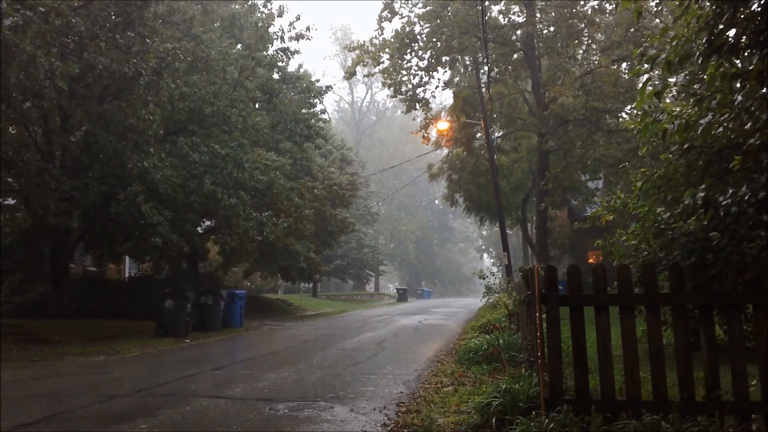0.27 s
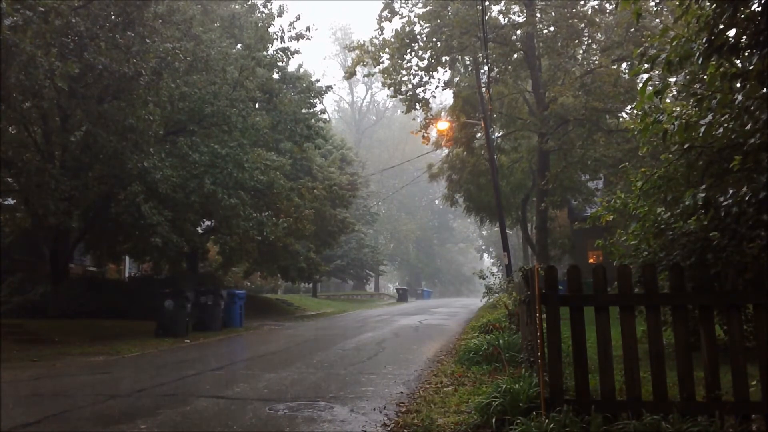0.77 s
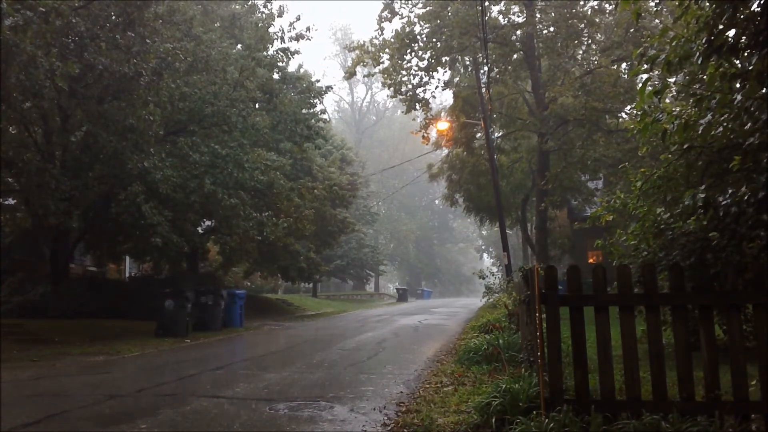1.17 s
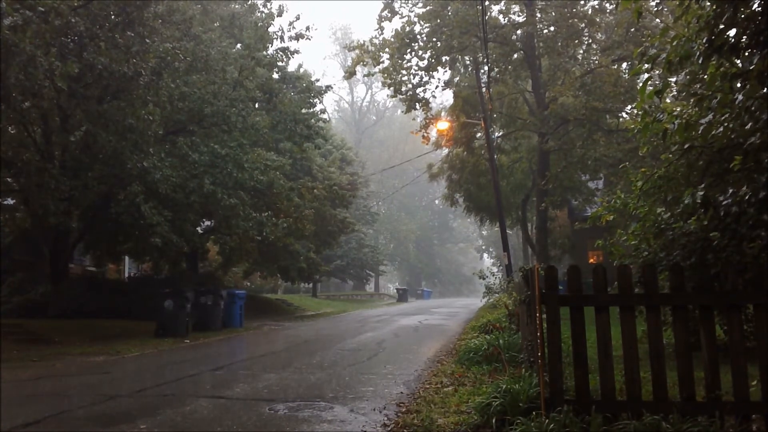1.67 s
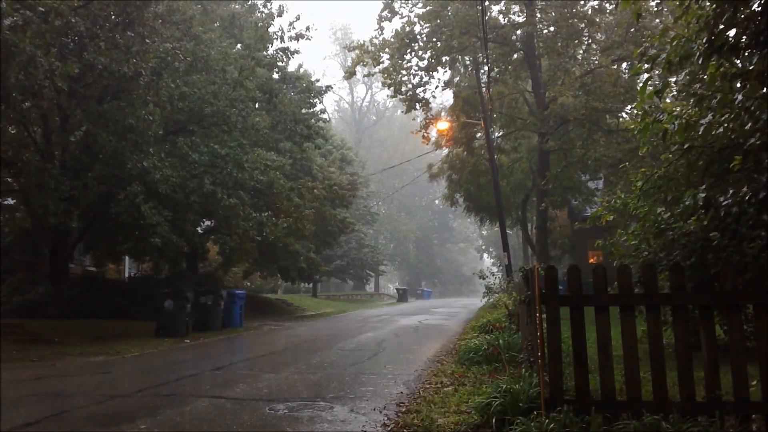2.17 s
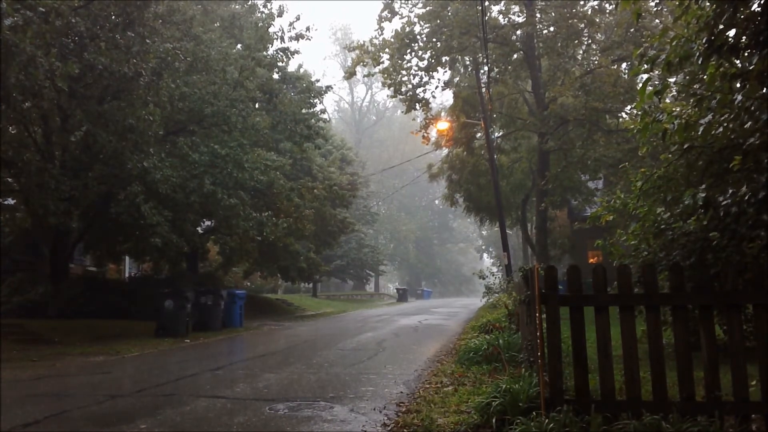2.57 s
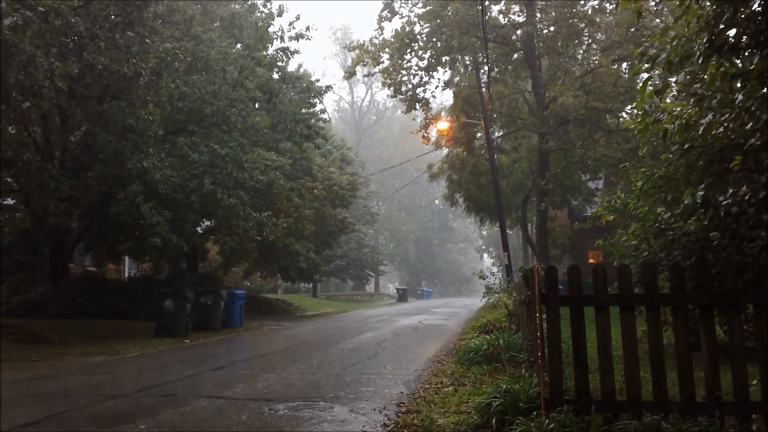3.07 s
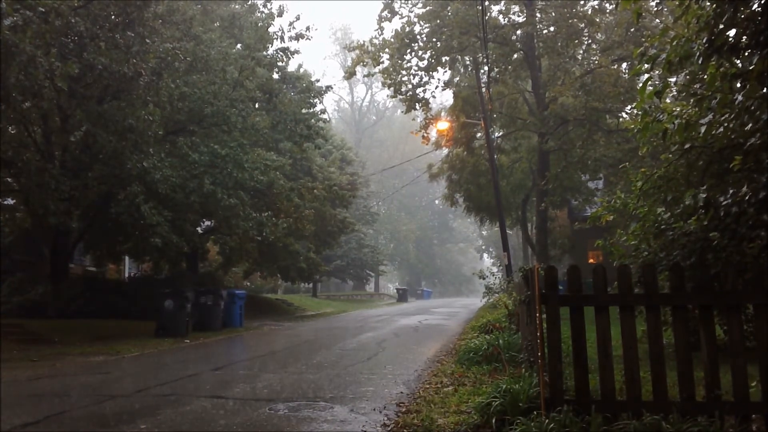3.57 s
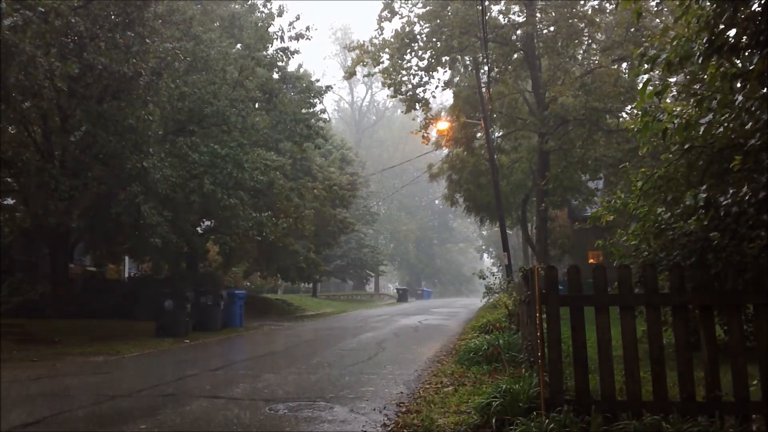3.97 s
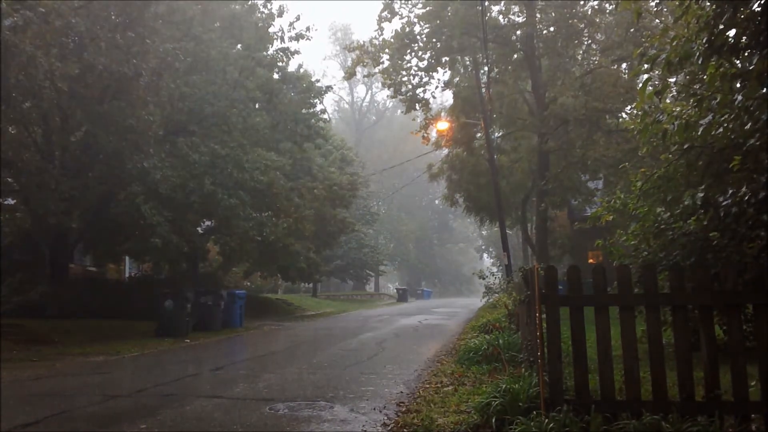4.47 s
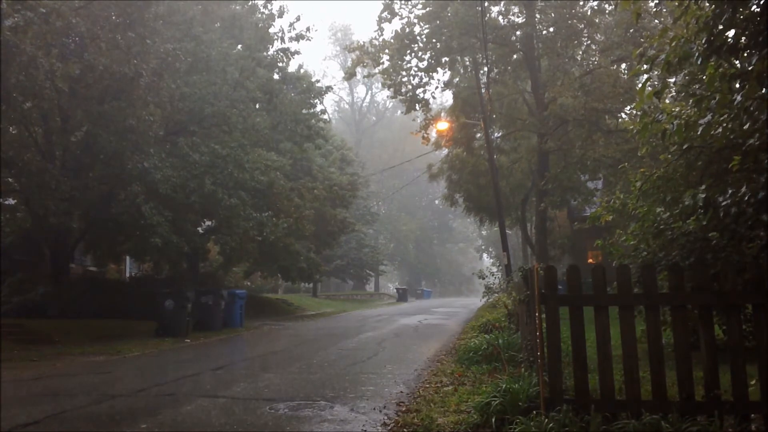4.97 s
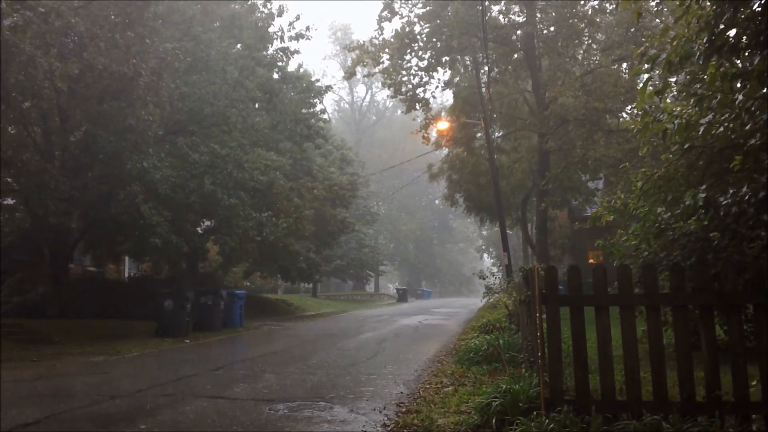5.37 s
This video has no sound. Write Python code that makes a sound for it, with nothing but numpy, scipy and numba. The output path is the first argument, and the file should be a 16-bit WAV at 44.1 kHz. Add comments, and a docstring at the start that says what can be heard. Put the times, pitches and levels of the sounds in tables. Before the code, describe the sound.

Raindrops splat loudly on the microphone and plop on an umbrella over a steady rainy wash and a distant car.

```python
"""Steady rain on a tree-lined street, heard from under an umbrella, a car droning far off throughout.
In the first second drops splat on the camera, ring its housing and overload the microphone's preamp;
the gain control ducks, then lets the rain swell back. Drips plop on the canopy, leaves tick faintly.
Around 2.5 s dull knocks on the camera duck the gain again, and lighter drops follow.
Near 5.2 s the wash rises a little as the far car passes on the wet road."""
import sys
import numpy as np
from scipy import signal
from scipy.fft import rfft, irfft
from scipy.io import wavfile
from numba import njit

SR = 44100
rng = np.random.default_rng(int(sys.argv[2]) if len(sys.argv) > 2 else 0)


def transcribe(u):
    """Save the signal u as a 16-bit wav file named by the first command-line argument.

    u: samples, shape (n,) or (channels, n), limited to [-1, 1]; the rate is SR.
    q: integer samples, one column per channel.
    """
    v = np.clip(np.atleast_2d(u).T, -1, 1)
    q = np.round(v * 32767).astype(np.int16)
    wavfile.write(sys.argv[1], SR, q)


N = 248718
TIME = np.arange(N) / SR


def undb(db):
    """Decibels to gain."""
    return 10 ** (np.asarray(db) / 20)


def level(x, db):
    """Scale to an rms level."""
    return x * undb(db) / np.sqrt(np.mean(x ** 2))


def decay(t, t60):
    """An envelope that falls 60 dB in t60 seconds."""
    return np.exp(-np.log(1000) * t / t60)


def ring(hz, t60):
    """One struck mode: a sine that dies away."""
    t = TIME[:int(1.5 * t60 * SR) + 2]
    return np.sin(2 * np.pi * hz * t) * decay(t, t60)


def band_noise(low_hz, high_hz, samples):
    """White noise through a band-pass."""
    band = signal.butter(2, [low_hz, high_hz], "band", fs=SR, output="sos")
    return signal.sosfilt(band, rng.standard_normal(samples))


def wander(rate_hz):
    """Slow random drift with a spread near 1."""
    knots = rng.standard_normal(1024)
    return np.interp(TIME * rate_hz, np.arange(len(knots)), knots)


def patter(sound, per_s, spread_db):
    """One sound struck at random times, mostly lightly, now and then harder."""
    chance, size, sign = rng.random(N), rng.exponential(size=N), rng.choice([-1, 1], N)
    impulses = (chance < per_s / SR) * sign * undb(spread_db * np.minimum(size, 5))
    return signal.oaconvolve(impulses, sound)[:N]


def strike(out, s, sound, contact_s):
    """Mix in a blow at time s; a drop pushes for a short while, which takes the edge off the sound."""
    t = np.arange(-64, 65) / SR
    push = np.exp(-(2 * t / contact_s) ** 2)
    softened = np.convolve(sound, push / push.sum())
    start = int(np.clip(s * SR - 64, 0, N - 1))
    out[start:start + len(softened)] += softened[:N - start]


# Rain and wet tyres far down the street: (frequency [Hz], relative spectral density [dB])
WASH_SPECTRUM = [(30, -36), (48, -24), (70, -21), (130, -11.5), (220, -10.5), (330, -9.5), (480, -4),
                 (660, 3), (900, -12.5), (1350, -21.5), (1900, -28), (2800, -36), (6500, -49),
                 (15000, -52.5)]


def street_wash():
    """Countless far drops and tyre hiss merge; each octave flickers, and all swell as the car goes by."""
    hz, db = np.transpose(WASH_SPECTRUM)
    octave = np.log2(np.maximum(np.fft.rfftfreq(N, 1 / SR), 1))
    spectrum = rfft(rng.standard_normal(N)) * undb(np.interp(octave, np.log2(hz), db))
    wash = np.zeros(N)
    for centre in range(4, 16):
        band = irfft(spectrum * np.maximum(1 - abs(octave - centre), 0), N)
        flicker_db = 1.8 if centre < 11 else 0.6  # the treble comes from more drops and is smoother
        wash += band * undb(flicker_db * wander(rate_hz=48))
    pass_s, pass_width_s = 5.23, 0.44
    swell_db = 1.8 * np.exp(-((TIME - pass_s) / pass_width_s) ** 2)
    return level(wash, db=-23.5) * undb(swell_db)


# Partials of the engine, far from the microphone: (frequency [Hz], rms level [dB])
ENGINE_PARTIALS = [(63.5, -34.5), (95, -42.5), (127, -38.5), (191, -45)]


def far_engine():
    """The car's engine drones, wavering in speed and strength."""
    engine_time = np.cumsum(1 + 0.018 * wander(rate_hz=6.5)) / SR
    drone = np.zeros(N)
    for hz, db in ENGINE_PARTIALS:
        strength = undb(4.0 * wander(rate_hz=6.9))
        drone += level(np.sin(2 * np.pi * hz * engine_time) * strength, db)
    return drone


def leaves():
    """Drops tick faintly on the street trees, the leaves sounding at four pitches."""
    foliage = np.zeros(N)
    for hz in np.geomspace(3300, 4150, num=4):
        click = ring(hz, t60=0.0024)
        foliage += patter(np.convolve(click, click), per_s=7, spread_db=1.0)
    return level(foliage, db=-58.5)


# Modes of the taut canopy, just above the microphone: (frequency [Hz], relative level [dB], t60 [s])
CANOPY_MODES = [(93.5, -9.5, 0.11), (164, -30, 0.12), (176.7, -21.5, 0.52), (306, -35.5, 0.21),
                (367.3, -5.5, 0.4), (517.8, 7.5, 0.16), (550, -11.5, 0.043), (601.5, -3, 0.42),
                (673, -26.5, 0.18)]
# Heavy drips from the trees onto it: (time [s], canopy level [dB], panel level [dB], panel pitch [Hz])
TREE_DRIPS = [(0.104, -17, -9.5, 375), (1.185, -17.5, -21, 570), (1.6343, -9.5, 3.5, 677),
              (1.858, -20, -43, 560), (1.977, -19.5, -12.5, 713), (2.060, -18, -20, 544),
              (2.1929, -15.5, 1, 618), (2.386, -22, -19, 376), (2.421, -15, -14, 387),
              (2.821, -14.5, -32, 530), (3.051, -28, -13.5, 597), (3.53, -12, -15.5, 475),
              (3.940, -27, -14.5, 365), (4.333, -11, -16, 500), (4.753, -13, -4, 534),
              (5.405, -18, -17, 380), (5.563, -11, -19, 398)]


def umbrella():
    """Fine rain keeps the canopy murmuring; drips land at different spots and stir its modes unevenly."""
    plops, murmur = np.zeros(N), np.zeros(N)
    spots = rng.standard_normal((len(TREE_DRIPS), len(CANOPY_MODES), 2))
    for k, (hz, mode_db, t60) in enumerate(CANOPY_MODES):
        # neighbouring modes start in opposite directions, so a plop takes a moment to build
        mode_gain = (-1) ** k * undb(mode_db)
        murmur += patter(mode_gain * ring(hz, t60), per_s=140, spread_db=7)
        for (s, canopy_db, _, _), (share, water) in zip(TREE_DRIPS, spots[:, k]):
            mode = ring(hz * (1 + 0.013 * water), t60)  # water lying on the cloth detunes it
            strike(plops, s, mode_gain * undb(canopy_db + 0.5 * share) * mode, contact_s=0.00089)
    # the struck panel gives a short tock, and the wet cloth flaps dully
    t = TIME[:SR // 8]
    for s, canopy_db, panel_db, panel_hz in TREE_DRIPS:
        panel = ring(panel_hz, t60=0.022)
        tock = np.convolve(panel, panel)  # builds over a few cycles
        strike(plops, s, undb(panel_db) * tock / abs(tock).max(), contact_s=0.00044)
        flap = level(band_noise(260, 620, len(t)), canopy_db - 4.5)
        strike(plops, s, flap * np.exp(-t / 0.013), contact_s=0.00024)
    return plops + level(murmur, db=-33)


def tick(hz, t60):
    """The snap of contact: a very short ring, roughened by the bursting drop, then a trace of spray."""
    t = TIME[:SR // 20]
    snap = -np.sin(2 * np.pi * hz * t) * decay(t, t60)
    spatter = band_noise(0.3 * hz, min(1.15 * hz, 0.4 * SR), len(t))
    burst = undb(-8.5) * np.exp(-t / 0.0019)
    spray = undb(-31.5) * np.exp(-t / 0.005)
    return snap + spatter * (burst + spray)


def housing(blows, relative_thud_db, low_cut_hz):
    """Each blow rings two modes of the camera housing and gives the whole body a low push."""
    out = np.zeros(N)
    t = TIME[:SR // 16]
    thud = ring(hz=129.6, t60=0.03)
    for s, db, hz, t60 in blows:
        contact_s = 0.25 / hz  # blows that ring lower are softer
        modes = ring(hz, t60) + undb(-14.5) * ring(1.8 * hz, t60)
        strike(out, s, undb(db) * modes, contact_s)
        # the spreading water jostles the housing and makes its ring uneven
        jostle = level(band_noise(0.13 * hz, 3 * hz, len(t)), db - 10.5)
        strike(out, s, jostle * decay(t, t60), contact_s)
        strike(out, s, undb(db + relative_thud_db) * thud, contact_s=0.00064)
    # so small a body gives no deep bass
    return signal.sosfilt(signal.butter(1, low_cut_hz, "high", fs=SR, output="sos"), out)


# Water knocking on the body that holds the microphone: (time [s], level [dB], pitch [Hz], t60 [s])
BODY_KNOCKS = [(.3653, 31.5, 287, 0.011), (1.3665, -10.5, 258, 0.021), (2.4315, 2.5, 313, 0.0096),
               (2.4462, 5, 198, 0.027), (2.4502, 35.5, 184, 0.022), (2.591, 23.5, 575, 0.013),
               (2.6888, 26.5, 525, .012)]


def camera_knocks():
    """A soft blow of water rings the housing low and hardly ticks."""
    out = housing(BODY_KNOCKS, relative_thud_db=-34, low_cut_hz=131)
    for s, db, _, _ in BODY_KNOCKS:
        strike(out, s, undb(db - 15.5) * tick(hz=820, t60=0.016), contact_s=0.00005)
    return out


# Square hits on the camera, right at the microphone, from droplets to splats:
# (time [s], tick level [dB], tick pitch [Hz], ring level [dB])
DIRECT_HITS = [(0.2121, 18.5, 1370, 12.5), (0.3199, 48, 2190, 51), (0.45, -15, 3810, -20),
               (.530, -25, 4000, 5), (0.5482, 30, 1950, 53), (0.6844, 35, 1200, 32), (1.021, -12, 3430, -3),
               (1.181, -11, 2330, -8), (1.530, -13, 2410, -8.5), (1.6347, 2.5, 2100, -4),
               (2.4311, -9.5, 1300, -10), (2.45, 11, 8500, -7), (2.5799, 7, 3610, 8.5),
               (2.749, -9.5, 4400, -20), (2.786, -14, 3550, -20), (2.8712, -12.5, 4170, -6),
               (3.3102, -9, 4250, -15), (3.368, -13.5, 5600, -2), (3.4838, 13.5, 1580, 10.5),
               (3.5393, -1, 1690, -17), (3.7677, 4.5, 1630, 3), (4.0266, -12, 2900, -5),
               (4.2111, -8.5, 1880, -15), (4.225, -17.5, 2030, -9.5), (4.4195, -36, 3700, -18),
               (4.7564, -14.5, 3470, -12), (4.8153, 18.5, 1640, 7.5), (4.992, -3, 1750, -1),
               (5.0938, 6.5, 1660, 4.5), (5.141, -25, 3400, -4.5)]


def camera_drops():
    """Each drop ticks on contact and rings the housing; stronger and lower ticks last longer."""
    ring_hz, hz_per_db, ring_t60 = 636.4, 1.34, 0.018  # harder hits ring a little higher
    blows = [(s, db, ring_hz + hz_per_db * db, ring_t60) for s, _, _, db in DIRECT_HITS]
    out = housing(blows, relative_thud_db=-19, low_cut_hz=69)
    for s, tick_db, tick_hz, _ in DIRECT_HITS:
        cycles = 4.5 * 2 ** (tick_db / 44.5)
        strike(out, s, undb(tick_db) * tick(tick_hz, t60=cycles / tick_hz), contact_s=0.00004)
    return out


def scene():
    """Everything that reaches the one microphone under the umbrella, from far to near."""
    return (street_wash() + far_engine() + leaves() + umbrella() + camera_knocks() + camera_drops())[None]


@njit
def follow(x, attack_s, release_s, charge):
    """The gain control's capacitor charges toward x and leaks away."""
    out = np.empty(len(x))
    for i in range(len(x)):
        charge += max(x[i] - charge, 0.) / (attack_s * SR + 1) - charge / (release_s * SR)
        out[i] = charge
    return out


def record(dry):
    """The preamplifier overloads, the gain control ducks, and the recorder clips and cuts the top."""
    rail, threshold, top_hz = undb(20.0), undb(-6.0), 16000
    preamp = np.clip(dry[0], -rail, rail)
    excess = np.maximum(abs(preamp) / threshold - 1, 0)
    # a brief tick is soon forgotten; a long overload holds the gain down
    quick = follow(excess, attack_s=0.00028, release_s=0.14, charge=0.)
    slow = follow(excess, attack_s=0.001, release_s=0.46, charge=1.8)  # still charged by earlier drops
    ducked = preamp / (1 + np.maximum(quick, slow))
    # the coupling capacitor makes flat tops droop
    coupled = signal.lfilter(*signal.butter(1, 35, "high", fs=SR), ducked)
    clipped = np.clip(coupled, -1, 1)
    # the microphone has a dip high in the treble
    dipped = signal.lfilter(*signal.iirnotch(12600, Q=3, fs=SR), clipped)
    return signal.sosfilt(signal.ellip(8, 0.2, 70, top_hz, fs=SR, output="sos"), dipped)[None]


dry = scene()
out = record(dry)
transcribe(out)
```